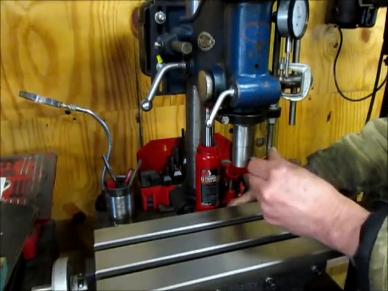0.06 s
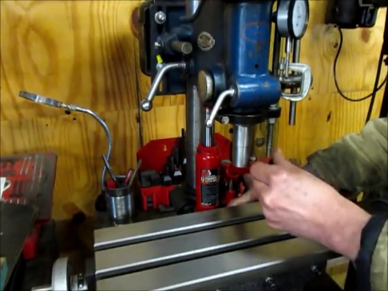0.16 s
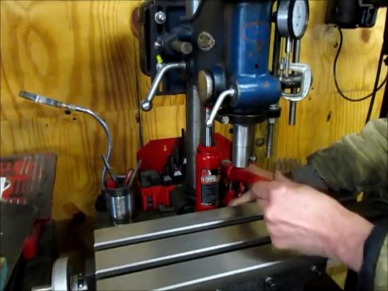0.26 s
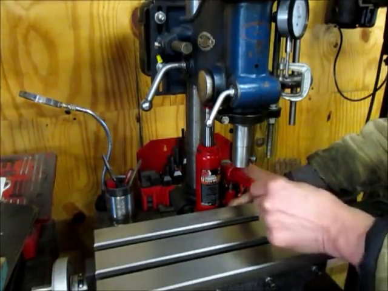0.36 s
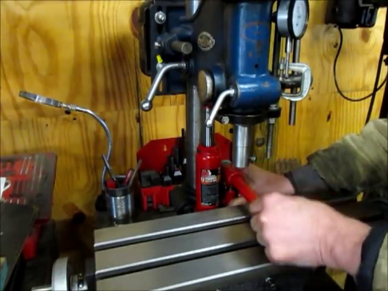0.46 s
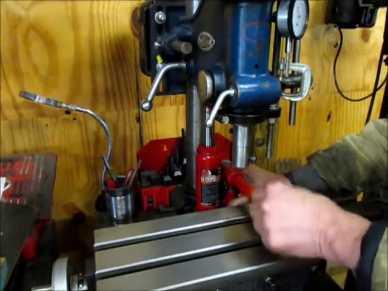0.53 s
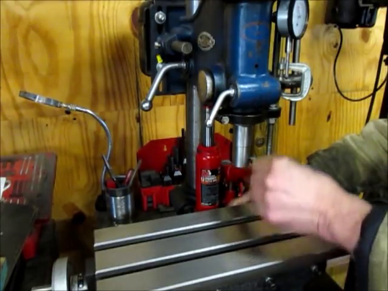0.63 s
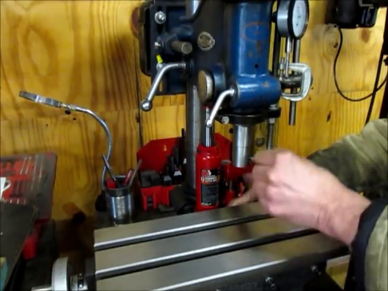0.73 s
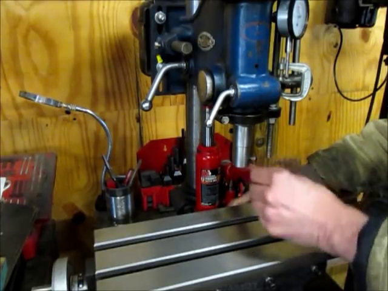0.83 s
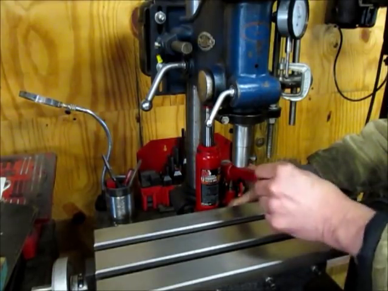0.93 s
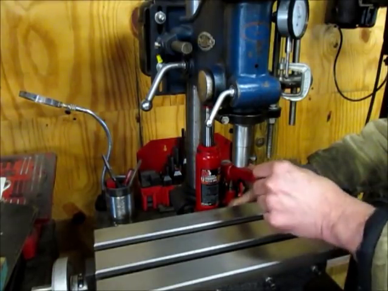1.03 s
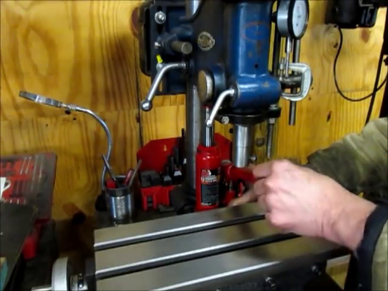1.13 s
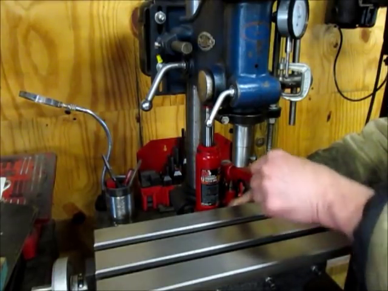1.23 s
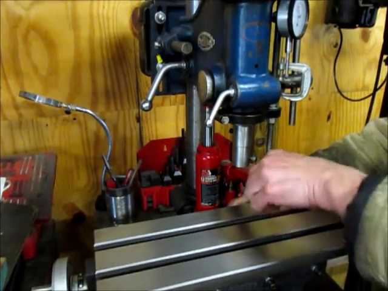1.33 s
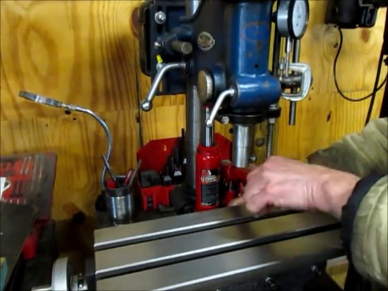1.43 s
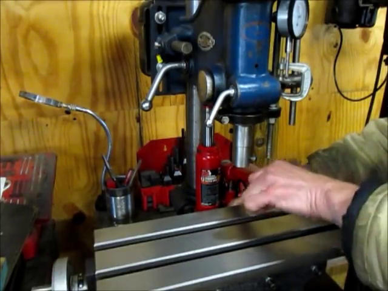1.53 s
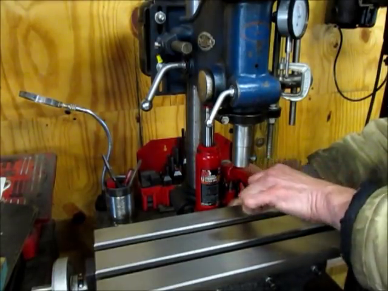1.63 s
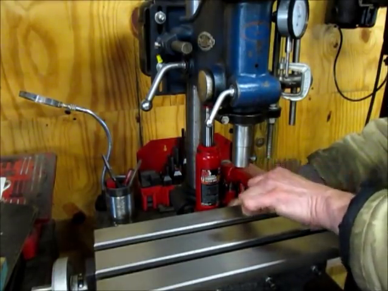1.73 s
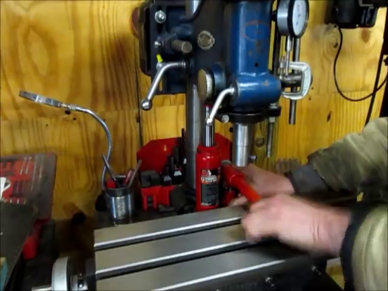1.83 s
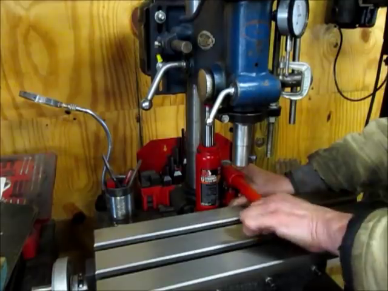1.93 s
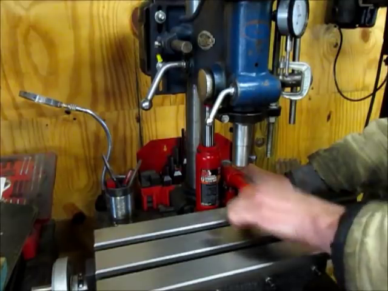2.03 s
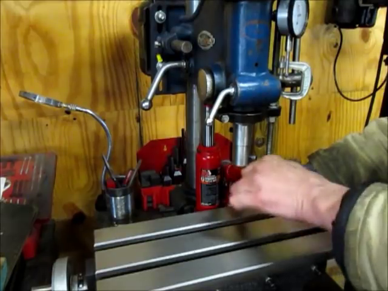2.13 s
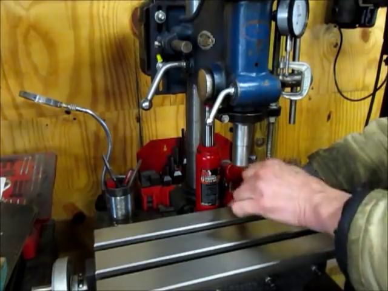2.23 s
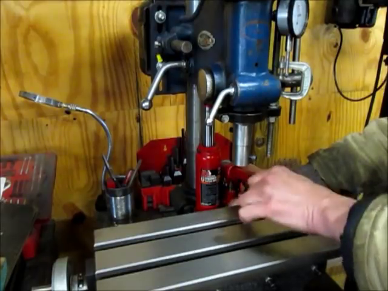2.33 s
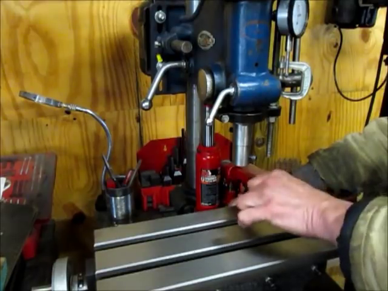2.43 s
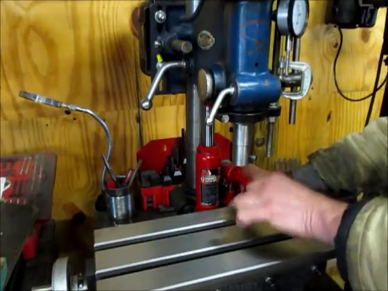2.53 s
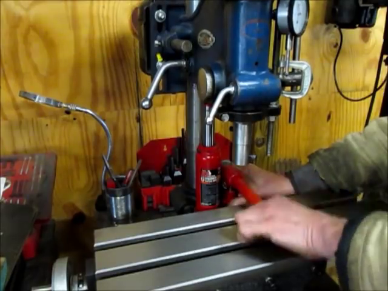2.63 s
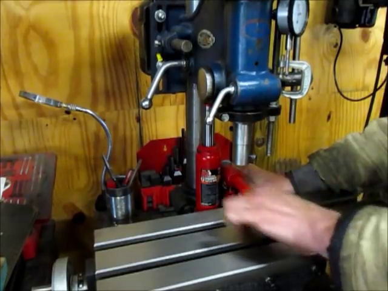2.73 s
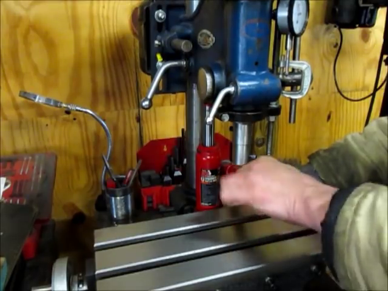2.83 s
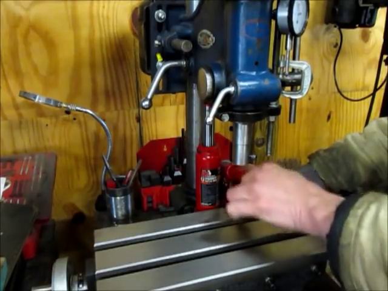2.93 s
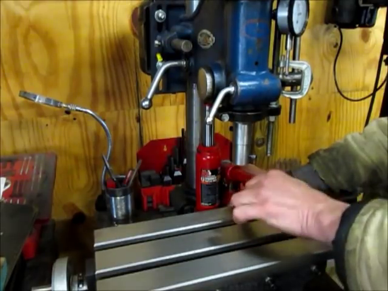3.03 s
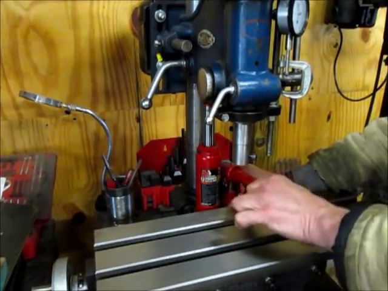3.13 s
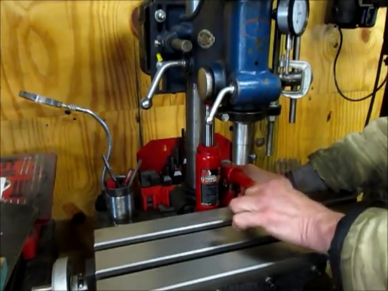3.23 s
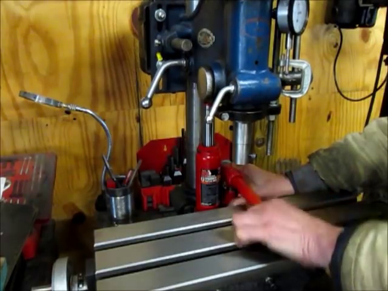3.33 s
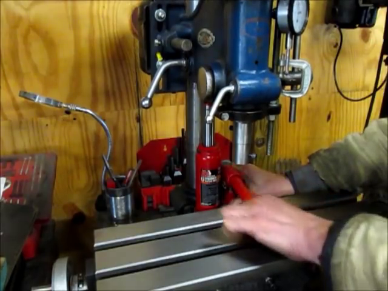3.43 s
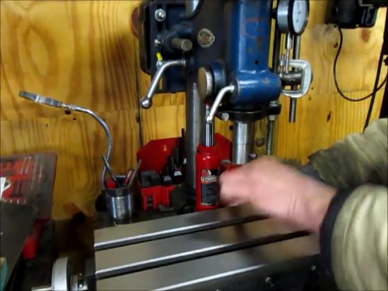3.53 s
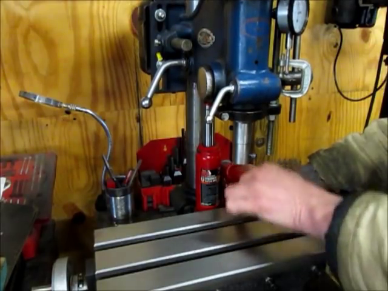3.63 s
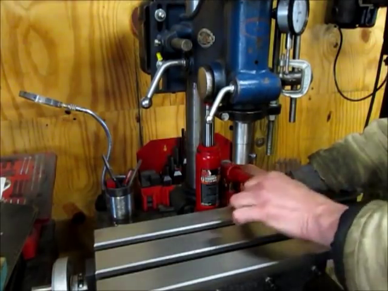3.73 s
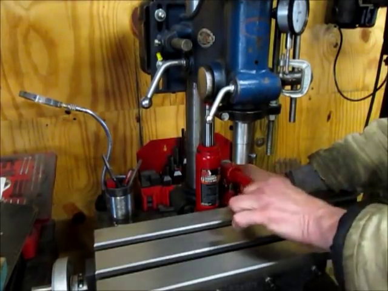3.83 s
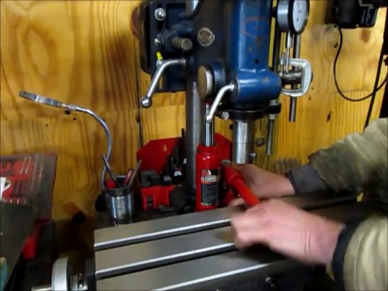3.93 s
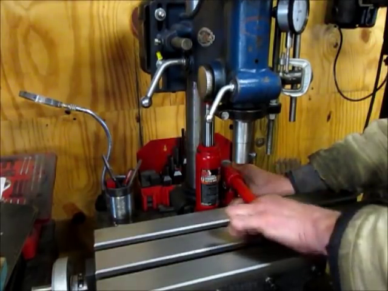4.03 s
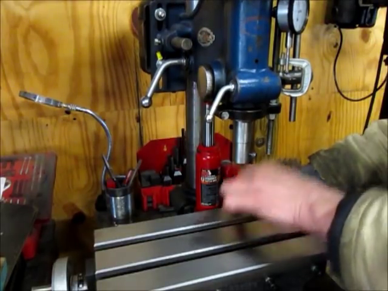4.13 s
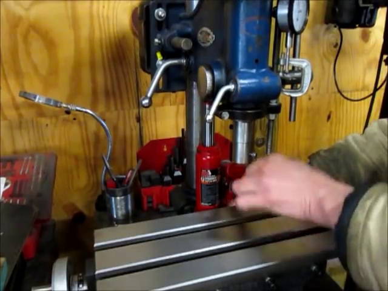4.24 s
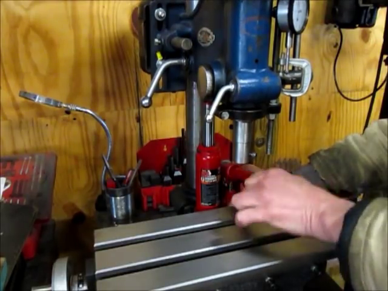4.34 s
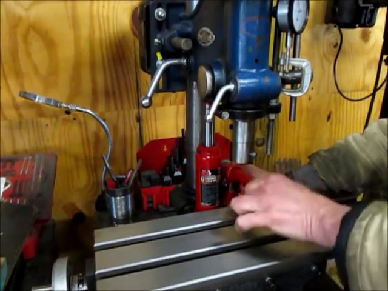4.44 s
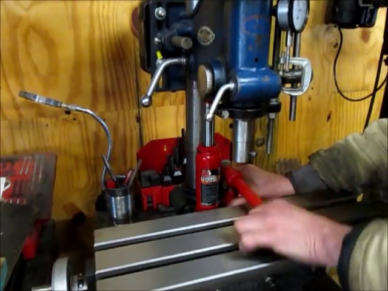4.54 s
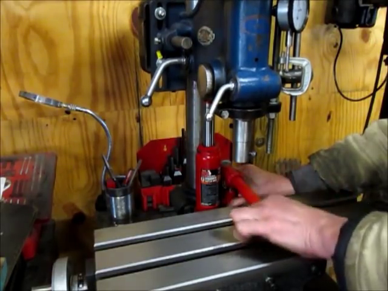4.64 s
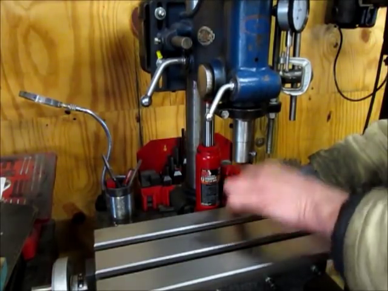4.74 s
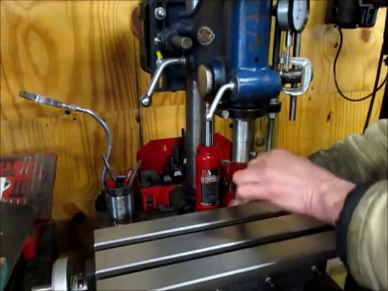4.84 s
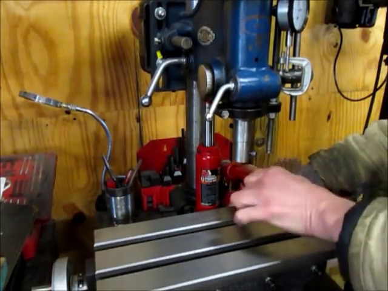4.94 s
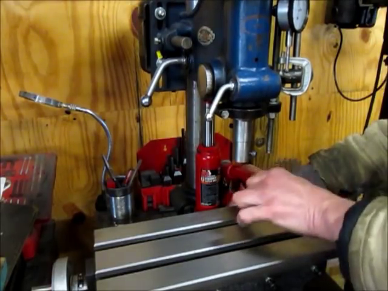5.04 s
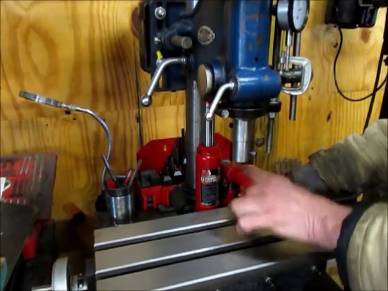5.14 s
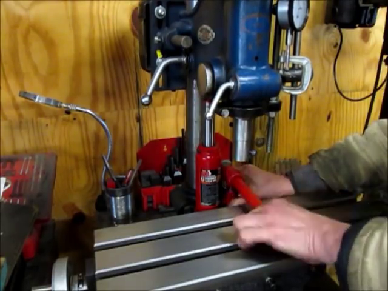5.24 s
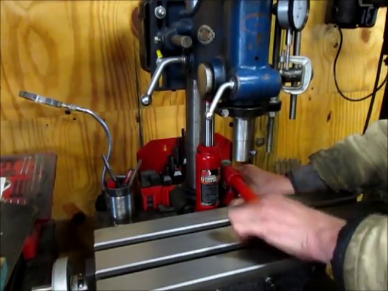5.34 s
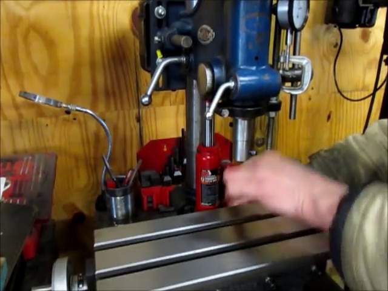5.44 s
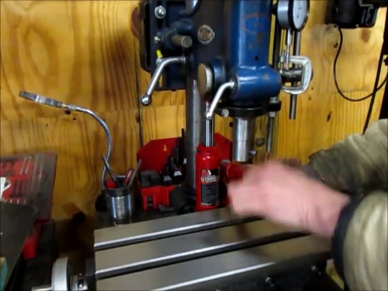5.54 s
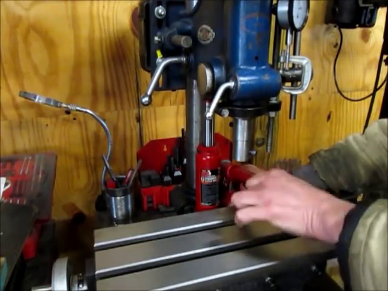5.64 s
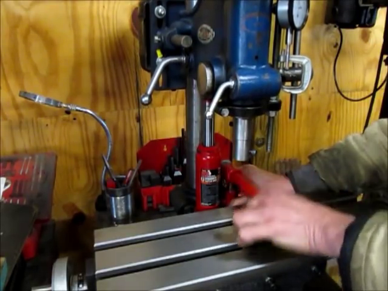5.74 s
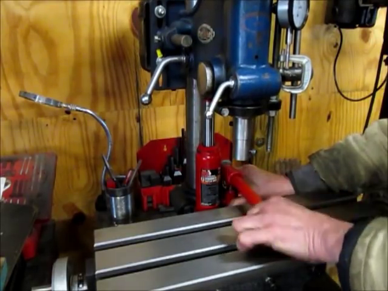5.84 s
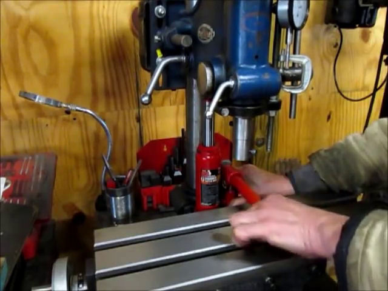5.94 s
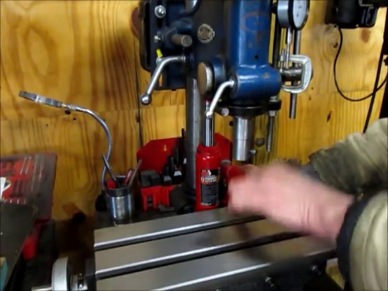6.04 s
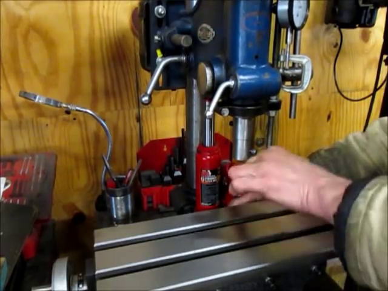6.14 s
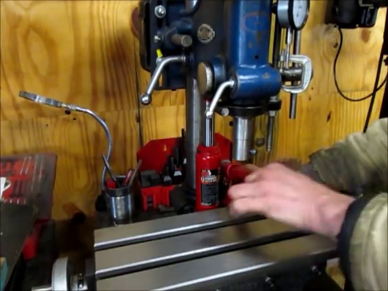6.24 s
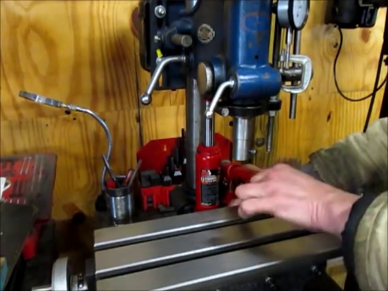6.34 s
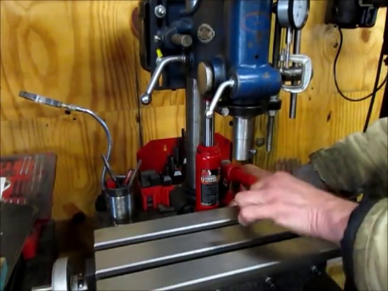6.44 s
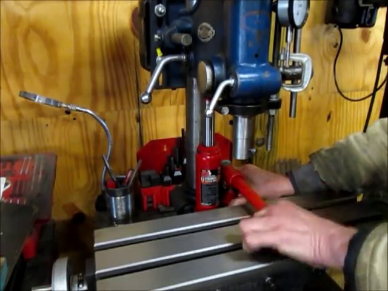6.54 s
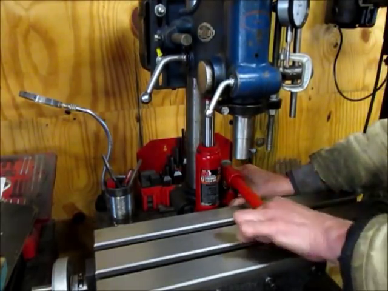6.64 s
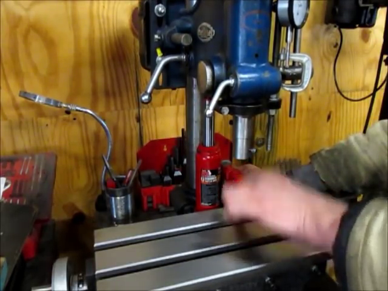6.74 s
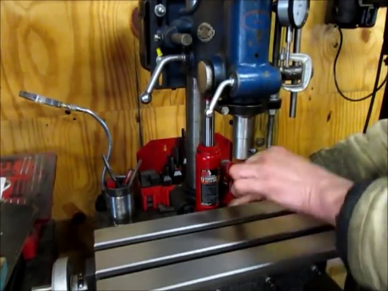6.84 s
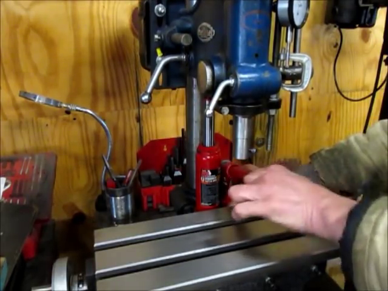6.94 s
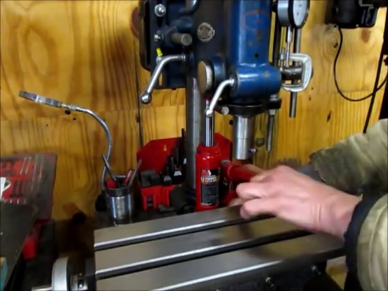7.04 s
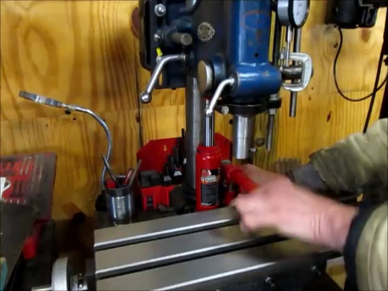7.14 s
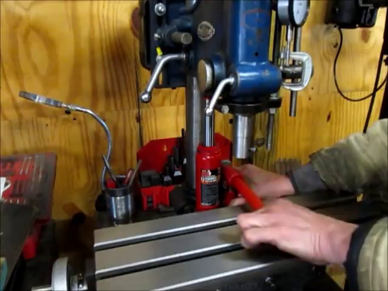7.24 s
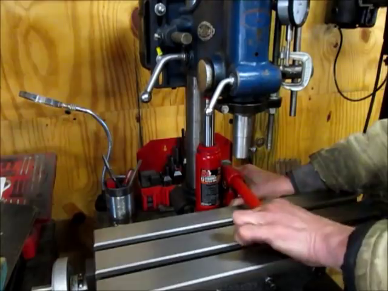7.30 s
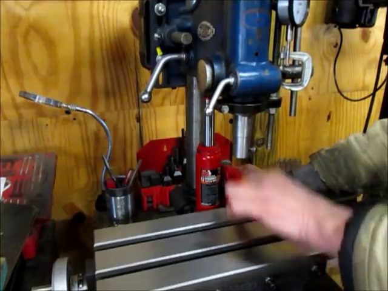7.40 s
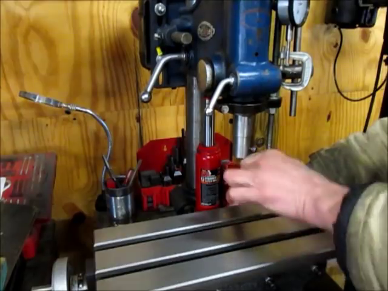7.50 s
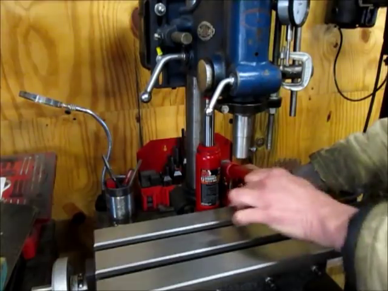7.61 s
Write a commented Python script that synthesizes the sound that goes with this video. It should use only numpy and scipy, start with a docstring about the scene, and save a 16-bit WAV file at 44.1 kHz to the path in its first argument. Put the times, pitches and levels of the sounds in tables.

```python
"""A wood-lined workshop: a small hydraulic bottle jack is hand-pumped on a drill press's steel table.
Each down stroke ends in a thud that rings the table and rocks the press. On the lift the linkage grinds,
ticks through its play and clacks against the top stop. The loose handle knocks in its socket and at times
slides home and rings; oil fizzes in the valves, the dry pivot squeaks. Heard close, with a short echo
over room air and a low hum."""
import sys
import numpy as np
from scipy import signal
from scipy.fft import rfft, irfft, next_fast_len
from scipy.io import wavfile
from scipy.ndimage import uniform_filter1d

SR = 44100
rng = np.random.default_rng(int(sys.argv[2]) if len(sys.argv) > 2 else 0)


def store_pcm(level_fs):
    """Save levels as 16-bit WAV."""
    pcm = np.round(np.clip(level_fs, -1, 1) * 32767).astype(np.int16)
    wavfile.write(sys.argv[1], SR, np.atleast_2d(pcm).T)


N = 338247
T = np.arange(N) / SR
AGE = T[:SR // 2]  # time since an event's onset [s]
ATTACK_SAMPLES = 882

# down strokes: (bottom stop time [s], table ring [dB], press frame [dB], steel contact [dB],
# contact hardness [dB/octave], turn knock [dB], grinding [dB], inlet valve delay [s])
STROKES = [(0.474, -24.5, -45, -36.5, -6, -55, -52, 0.144),
           (1.886, -15.5, -29, -34.5, -2, -35.5, -31, 0.21), (2.635, -12, -32, -33.5, 0, -34.5, -32.5, .17),
           (3.353, -43, -47, -46, -4, -41.5, -37, .18), (3.958, -13, -34.5, -37.5, -0.8, -36.5, -34, 0.18),
           (4.558, -18, -30, -40, -2.3, -37, -32, 0.18), (5.229, -15, -27, -36, -3.5, -38.5, -29.5, .197),
           (6.573, -32, -37, -51, 0, -36.5, -33, 0.19), (7.232, -20, -31.5, -44, -2, -33, -33, .2)]
# jack body on the table: (frequency [Hz], level [dB], t60 [s])
BODY_MODES = [(306.8, -12, 0.16), (365, 2, 0.073), (392.6, 5, 0.071), (431.6, -1.5, 0.066),
              (513, -2.5, 0.06), (561, -2, 0.074), (627, -10, 0.13)]
# dense upper modes of the steel parts: (frequency [Hz], level [dB])
STEEL_SPECTRUM = [(500, -44), (750, 12.5), (1500, 5), (2300, 1.5), (3200, -37)]


def amp(db):
    """Decibels to gain."""
    return 10 ** (np.asarray(db) / 20)


def unit_rms(x, count=None):
    """Scale to rms 1 over the first count samples."""
    return x / np.sqrt(np.mean(x[:count] ** 2))


def add(out, time_s, x):
    """Mix x into out from time_s."""
    start = max(int(time_s * SR), 0)
    out[start:start + len(x)] += x[:max(N - start, 0)]


def log_interp(points, hz):
    """Read (Hz, value) points on a log-frequency axis."""
    point_hz, value = np.transpose(points)
    return np.interp(np.log(hz + 1), np.log(point_hz), value)


def colour(x, spectrum):
    """Minimum-phase filter through (Hz, dB) points, rolling off beyond both ends."""
    n = next_fast_len(2 * len(x), True) // 2 * 2
    hz = np.arange(n // 2 + 1) * SR / n
    low_cut = np.minimum((hz + 1) / spectrum[0][0], 1) ** 2
    high_cut = np.minimum(spectrum[-1][0] / (hz + 1), 1) ** 4
    cepstrum = irfft(np.log(amp(log_interp(spectrum, hz)) * low_cut * high_cut), n)
    cepstrum[1:n // 2] *= 2
    cepstrum[n // 2 + 1:] = 0
    return irfft(rfft(x, n) * np.exp(rfft(cepstrum)), n)[:len(x)]


def decay(t60_s):
    """Exponential fall, 60 dB in t60_s."""
    return np.exp(-np.log(1000) * AGE / t60_s)


def mode_bank(modes):
    """One damped sine per mode."""
    return np.array([amp(db) * decay(t60_s) * np.sin(2 * np.pi * hz * AGE) for hz, db, t60_s in modes])


def strike(bank, scatter_db, rise_s):
    """Each blow lands elsewhere and weights the modes differently."""
    weights = amp(scatter_db * rng.standard_normal(len(bank)))
    onset = 1 - np.exp(-AGE / rise_s)
    return unit_rms(weights @ bank * onset, ATTACK_SAMPLES)


def crack(spectrum, t60_s, tail_db, tail_t60_s, snap_db):
    """Dense modes as noise: snap of first contact, fast decay, longer tail."""
    burst = rng.standard_normal(len(AGE)) * (decay(t60_s) + amp(tail_db) * decay(tail_t60_s))
    burst[0] += amp(snap_db)
    return unit_rms(colour(burst, spectrum), ATTACK_SAMPLES)


def part_levels_db(mix, db, hardness):
    """Level of each ringing part; hardness [dB/octave] tilts them about 1 kHz."""
    centre_hz, part_db = np.transpose(mix)
    return db + part_db + hardness * np.log2(centre_hz / 1000)


def soften(x, level_db, soft_hz=7500, soft_db=-60, hz_per_db=300):
    """A gentle blow stays in contact longer and loses treble."""
    cutoff_hz = np.clip(soft_hz + hz_per_db * (level_db - soft_db), 5000, 18000)
    lowpass = signal.butter(4, cutoff_hz, fs=SR, output="sos")
    return unit_rms(signal.sosfilt(lowpass, x), ATTACK_SAMPLES)


def thuds(table_trim_db=-1, rock_hz=32.3, rock_db=-12.5, rock_peak_s=0.075):
    """The bottom stop's soft blow rings table and frame; the press rocks on its stand."""
    # press table and frame: (frequency [Hz], level [dB], t60 [s])
    table_modes = [(315.4, -9.5, 0.091), (337.5, 5.5, 0.059), (374.5, -6.5, 0.091), (610, -22, 0.086),
                   (690, -16.5, 0.076)]
    frame_modes = [(67, -8, 0.078), (93.4, 4.5, 0.34), (164, -5, 0.21), (215.7, 0, 0.28)]
    # first blow, then bumps as the jack settles: (delay [s], gain [dB])
    bumps = [(0, -2), (.0058, -12.5), (0.0283, -13.5)]
    out, table_bank, frame_bank = np.zeros(N), mode_bank(table_modes), mode_bank(frame_modes)
    swell = AGE / rock_peak_s * np.exp(1 - AGE / rock_peak_s)
    rocking = amp(rock_db) * swell * np.sin(2 * np.pi * rock_hz * AGE)
    for time_s, table_db, frame_db, *_ in STROKES:
        table_ring = strike(table_bank, scatter_db=1, rise_s=0.0015)
        for delay_s, bump_db in bumps:
            add(out, time_s + delay_s, -amp(table_db + table_trim_db + bump_db) * table_ring)
        frame_ring = strike(frame_bank, scatter_db=5, rise_s=0.0015)
        add(out, time_s, amp(frame_db) * (frame_ring + rocking))
    return out


def knocks(blows, mix):
    """Steel on steel: small parts crack at once, the heavy body follows."""
    # low and high steel modes: (frequency [Hz], level [dB], t60 [s])
    clank_modes = [(716.5, 2.5, 0.058), (722, -10, 0.05), (944, 8, 0.061), (1115.6, -4, 0.085)]
    clang_modes = [(1210, -6, 0.089), (1437, -5.5, 0.061), (1510, 4, 0.031), (1740, -8.5, 0.048),
                   (2006, -5.5, 0.035), (2135, -6.5, 0.044), (2387, -12, 0.076)]
    # bright ring and treble edge: (frequency [Hz], level [dB])
    ring_spectrum = [(1800, -26), (2600, 11), (3200, 7.5), (3700, 4.5), (4300, 6), (5100, 2), (6200, -5.5),
                     (7800, -18)]
    edge_spectrum = [(5200, -32), (7000, 5.5), (8500, -3.5), (11000, -13), (15000, -7)]
    out = np.zeros(N)
    body, clank, clang = map(mode_bank, (BODY_MODES, clank_modes, clang_modes))
    for time_s, db, hardness in blows:
        levels_db = part_levels_db(mix, db, hardness)
        parts = [strike(body, scatter_db=5.5, rise_s=0.0066),
                 strike(clank, scatter_db=4.5, rise_s=0.0083),
                 strike(clang, scatter_db=2.5, rise_s=0.00094),
                 crack(STEEL_SPECTRUM, t60_s=0.035, tail_db=-5, tail_t60_s=0.24, snap_db=10.5),
                 crack(ring_spectrum, t60_s=0.022, tail_db=5, tail_t60_s=0.071, snap_db=15)]
        edge = crack(edge_spectrum, t60_s=0.0082, tail_db=-7, tail_t60_s=0.083, snap_db=9)
        parts.append(soften(edge, levels_db[-1]))
        add(out, time_s, amp(levels_db) @ np.array(parts))
    return out


def ticks(touches, mix):
    """Light contacts ring the handle tube, pins and jack body."""
    # ring, clink and treble edge: (frequency [Hz], level [dB])
    ring_spectrum = [(1800, -15.5), (2600, 0), (3300, -3), (4200, 2.5), (5200, -13)]
    clink_spectrum = [(4000, -8), (4900, 3), (5500, 5), (6100, -2.5), (7200, -19.5)]
    edge_spectrum = [(5500, 0.5), (7300, -1.5), (8500, -12.5), (10000, -15), (15500, -32)]
    out, body = np.zeros(N), mode_bank(BODY_MODES)
    for time_s, db, hardness in touches:
        parts = [strike(body, scatter_db=0.5, rise_s=0.0093),
                 crack(STEEL_SPECTRUM, t60_s=0.13, tail_db=3, tail_t60_s=0.16, snap_db=0),
                 crack(ring_spectrum, t60_s=0.0083, tail_db=3, tail_t60_s=0.084, snap_db=2),
                 crack(clink_spectrum, t60_s=0.014, tail_db=-16, tail_t60_s=0.06, snap_db=14),
                 crack(edge_spectrum, t60_s=0.022, tail_db=-7, tail_t60_s=0.1, snap_db=-7)]
        add(out, time_s, amp(part_levels_db(mix, db, hardness)) @ np.array(parts))
    return out


def lever_stops(contact_lead_s=0.007):
    """The lever hits bottom just ahead of the hand's weight; at the top a pin first ticks in its play."""
    # top stop: (time [s], level [dB], hardness [dB/octave], pin lead [s], pin level [dB])
    clacks = [(2.325, -29.5, -1.5, .027, -38), (3.015, -31, -1.3, .017, -41), (3.714, -28, 2, .025, -42.5),
              (4.333, -29, -1.6, .031, -35.5), (4.949, -27, -2.5, .021, -38),
              (5.597, -23.5, 0.36, .017, -34), (6.245, -32.5, 3, .012, -32), (6.958, -25, 1.8, .018, -37),
              (7.6316, -25, 1.4, .02, -34.5)]
    # one row per part of knocks() and of ticks(): (centre [Hz], gain [dB])
    stop_mix = [(400, 3), (900, -2), (1600, -8), (1490, -2.5), (3700, -11), (8000, -21)]
    pin_mix = [(400, 3), (1000, -1), (3300, -8.5), (5300, -13), (7000, -10)]
    bottom = [(time_s - contact_lead_s, db, hardness) for time_s, _, _, db, hardness, *_ in STROKES]
    top = [(time_s, db, hardness) for time_s, db, hardness, *_ in clacks]
    pins = [(time_s - lead_s, pin_db, 0) for time_s, _, _, lead_s, pin_db in clacks]
    return knocks(bottom + top, stop_mix) + ticks(pins, pin_mix)


def handle_rattle(turn_delay_s=0.078, turn_db_per_octave=-2):
    """The loose handle knocks on reversing after each down stroke, and in between; the linkage ticks."""
    # socket knocks and linkage ticks: (time [s], level [dB], hardness [dB/octave])
    stray_knocks = [(0.24, -42, -5.5), (0.275, -44.5, -5.5), (0.779, -47.5, -1.5), (0.821, -44.5, -1),
                    (0.841, -44.5, 1.5), (0.874, -47, -5.5), (1.995, -42, -6.5), (4.668, -36, -0.5),
                    (5.354, -44, 1), (6.639, -46.5, -7.5), (6.699, -38.5, -1)]
    linkage_ticks = [(0.554, -58.5, 1.5), (2.157, -45, -1), (2.699, -45.5, 1.5), (2.769, -36.5, -1.7),
                     (2.863, -47, 1.5), (2.998, -38.5, .5), (3.208, -66, 7.5), (3.439, -46.5, 2),
                     (3.492, -38.5, -3), (4.319, -36.5, 3.5), (4.719, -38, -4.5), (4.774, -40.5, -7.5),
                     (4.894, -40, -2), (4.9356, -31.5, 3), (5.499, -36, -3), (6.023, -43, -1),
                     (6.034, -36, 0.8), (6.233, -35.5, 4), (6.825, -38, -.5), (6.847, -33, -.3),
                     (7.387, -53.5, 4.5), (7.524, -35.5, -1.5), (7.611, -41, 4)]
    # one row per part of knocks() and of ticks(): (centre [Hz], gain [dB])
    knock_mix = [(394, 3), (900, -2.5), (1620, -8.5), (1490, -4), (3670, -12), (8000, -27)]
    tick_mix = [(400, -4.5), (1000, -1), (3300, -4.5), (5300, -12), (7000, -21)]
    turns = [(time_s + turn_delay_s, db, turn_db_per_octave) for time_s, *_, db, _, _ in STROKES]
    return knocks(turns + stray_knocks, knock_mix) + ticks(linkage_ticks, tick_mix)


def handle_tube(ring_db=-12):
    """The tube slides home in its socket with a bright clank and rings on."""
    # tube hits: (time [s], level [dB], hardness [dB/octave])
    hits = [(0.592, -36.5, -3), (0.752, -42, -1.1), (4.128, -33.5, 0.6), (6.0492, -25.5, 1.4)]
    # one row per part of knocks(): (centre [Hz], gain [dB])
    hit_mix = [(400, -0.5), (900, -3.5), (1600, -2), (1500, -4.5), (3700, -4.5), (8000, -41)]
    # free tube: (frequency [Hz], level [dB], t60 [s])
    tube_modes = [(1470, -3, 0.2), (1565, 13.5, 0.15), (1950, -2, .35), (2400, -2, 0.19), (3070, -1, 0.41),
                  (3650, 0, 0.32), (4290, -8.5, 0.43), (5730, -17, .3)]
    out, bank = knocks(hits, hit_mix), mode_bank(tube_modes)
    for time_s, db, _ in hits:
        add(out, time_s, amp(db + ring_db) * strike(bank, scatter_db=2.5, rise_s=0.0008))
    return out


def stick_slip(rate_hz, spread_db):
    """Dense tiny pushes, a few much larger than the rest."""
    sizes = amp(spread_db * np.minimum(rng.exponential(size=N), 4))
    return (rng.random(N) < rate_hz / SR) * sizes * rng.standard_normal(N)


def grinding(delay_s=0.061, ramp_s=0.017, lift_s=0.35, fall_db_per_s=42.5, stop_db=-3, stop_s=0.039):
    """Linkage friction: swells briefly around the bottom stop, returns on the lift and eases off."""
    # friction noise: (frequency [Hz], level [dB])
    friction_spectrum = [(120, -32.5), (200, -6), (239, -15), (353, 1), (453, -5), (513, 2.5), (658, -6.5),
                         (939, -8), (1030, -10.5), (1360, -12), (2500, -24), (3690, -27.5), (6400, -45),
                         (8660, -54), (14000, -75)]
    pressure = np.zeros(N)
    gate = np.clip(np.minimum(AGE, lift_s - AGE) / ramp_s, 0, 1)
    lift = gate * amp(-fall_db_per_s * AGE)
    for time_s, *_, grind_db, _ in STROKES:
        add(pressure, time_s + delay_s, amp(grind_db) * lift)
        pressure += amp(grind_db + stop_db) * np.exp(-np.abs(T - time_s) / stop_s)
    grit = stick_slip(rate_hz=900, spread_db=3.5)
    return unit_rms(colour(grit, friction_spectrum)) * pressure


def pivot_squeaks(glide=0.102, waver=0.038):
    """Dry steel sings briefly as it slides, pitch rising and unsteady."""
    # squeaks: (time [s], start pitch [Hz], level [dB], length [s])
    squeaks = [(0.244, 3920, -45.5, 0.031), (2.045, 3650, -47, 0.035), (4.894, 3780, -45, 0.033)]
    out = np.zeros(N)
    for time_s, start_hz, db, length_s in squeaks:
        progress = np.minimum(AGE / length_s, 1)
        wobble = unit_rms(uniform_filter1d(rng.standard_normal(len(AGE)), size=60))
        pitch_hz = start_hz * (1 + glide * progress + waver * wobble)
        phase = 2 * np.pi * np.cumsum(pitch_hz) / SR
        add(out, time_s, amp(db) * np.sin(np.pi * progress) * np.sin(phase))
    return out


def valve_fizz(width_s=0.008, outlet_lead_s=0.025, outlet_db=-62, inlet_db=-51.5):
    """Oil fizzes as a ball valve lifts: the outlet late in the down stroke, the inlet mid-lift."""
    # oil fizz: (frequency [Hz], level [dB])
    fizz_spectrum = [(5500, 0.5), (7300, -0.5), (8200, -1), (8900, 2.5), (9800, -5), (11000, -18),
                     (15000, -31)]
    flow = np.zeros(N)
    for time_s, *_, inlet_delay_s in STROKES:
        for peak_s, db in (time_s - outlet_lead_s, outlet_db), (time_s + inlet_delay_s, inlet_db):
            flow += amp(db) * np.exp(-((T - peak_s) / width_s) ** 2 / 2)
    return flow * unit_rms(colour(rng.standard_normal(N), fizz_spectrum))


def wall_echo(x, gap_s=0.0033, build_s=0.0064):
    """Wooden walls return a short, dense echo; each band decays at its own rate."""
    # room decay: (frequency [Hz], t60 [s])
    band_decays = [(100, 2.8), (350, 0.55), (1400, 0.78), (3700, 0.8), (7000, 0.53), (11000, .3)]
    # echo strength: (frequency [Hz], level [dB])
    echo_spectrum = [(60, -15.5), (200, -10), (350, -13), (600, -9), (1400, -6.5), (4000, -7.5),
                     (7000, -10.5), (10000, -12), (13000, -19)]
    hz = np.arange(len(AGE) // 2 + 1) * SR / len(AGE)
    noise_bins = rfft(rng.standard_normal(len(AGE)))
    centres_hz, t60s_s = np.transpose(band_decays)
    onset = 1 - np.exp(-np.maximum(AGE - gap_s, 0) / build_s)
    response = np.zeros(len(AGE))
    for selector, t60_s in zip(np.eye(len(centres_hz)), t60s_s):
        band = irfft(noise_bins * log_interp(np.c_[centres_hz, selector], hz), len(AGE))
        envelope = onset * decay(t60_s)
        response += band * envelope / np.sqrt(np.sum(envelope ** 2))
    return signal.fftconvolve(x, colour(response, echo_spectrum))[:N]


def room_air(air_db=-49.5, side_trim_db=-1, hum_hz=70.7, hum_db=-70):
    """Still air and a low hum; in the treble each channel hisses on its own."""
    # room air: (frequency [Hz], level [dB])
    air_spectrum = [(15, -48), (25, -7), (32, -24), (46, -18.5), (69, -1), (99, -11.5), (188, -15),
                    (227, -11.5), (359, -17.5), (1170, -23.5), (1270, -22), (1380, -24), (1850, -26),
                    (5580, -35.5), (15500, -46.5)]
    # stereo spread of the hiss: (frequency [Hz], side gain [dB])
    side_spectrum = [(60, -43), (1200, -36), (2500, -37), (4500, -15), (8000, -3), (16000, 2)]
    mid, side = (amp(air_db) * unit_rms(colour(rng.standard_normal(N), air_spectrum)) for _ in range(2))
    side = amp(side_trim_db) * colour(side, side_spectrum)
    hum = amp(hum_db) * np.sqrt(2) * np.sin(2 * np.pi * hum_hz * T)
    return mid + hum + np.array([side, -side])


def scene():
    """Jack and echo centred, over stereo room air."""
    impacts = thuds() + lever_stops() + handle_rattle() + handle_tube()
    jack = impacts + grinding() + valve_fizz() + pivot_squeaks()
    return jack + wall_echo(jack) + room_air()


def record(dry):
    """Steep low-pass and a small DC offset."""
    cutoff_hz, dc_offset = 15600, -0.0044
    lowpass = signal.ellip(10, 0.2, 80, cutoff_hz, fs=SR, output="sos")
    return signal.sosfilt(lowpass, dry) + dc_offset


dry = scene()
out = record(dry)
store_pcm(out)
```